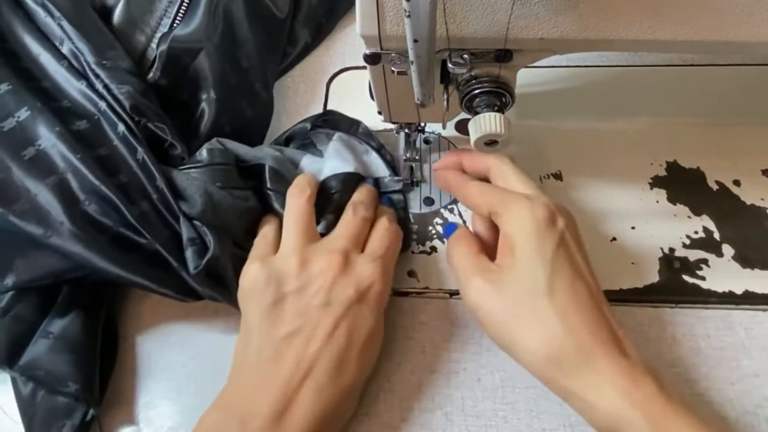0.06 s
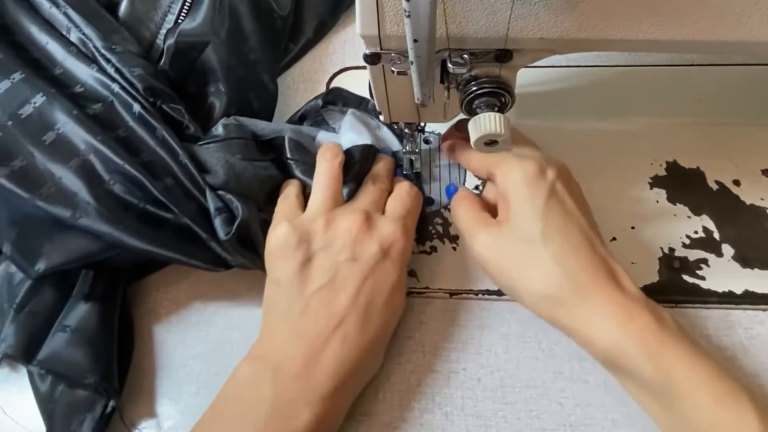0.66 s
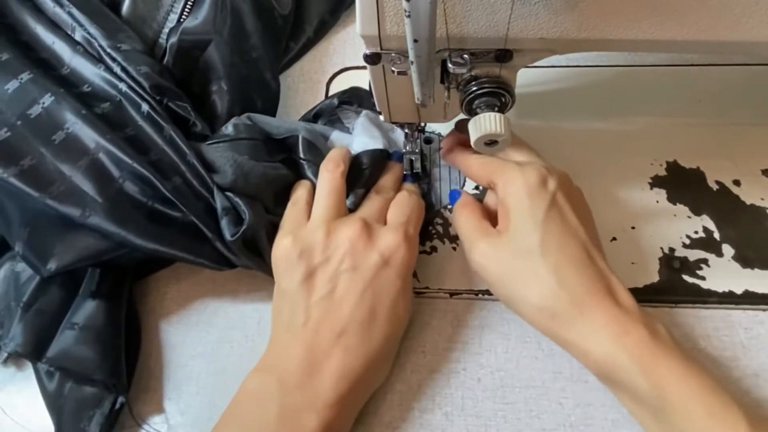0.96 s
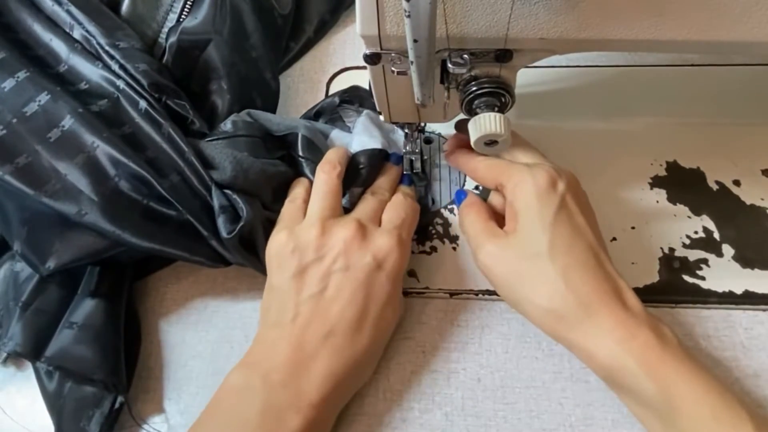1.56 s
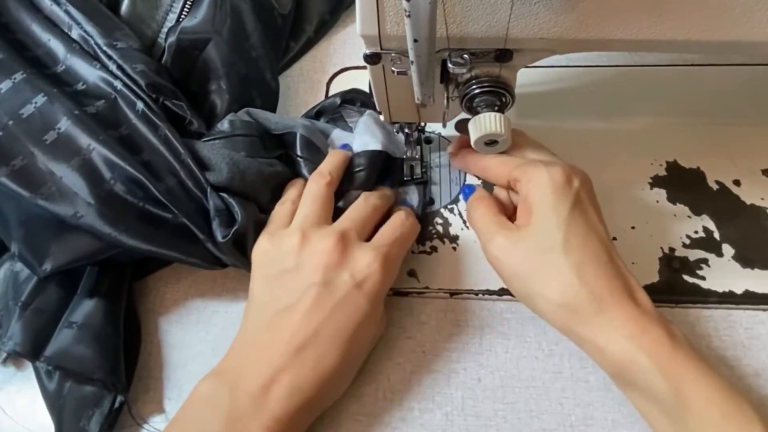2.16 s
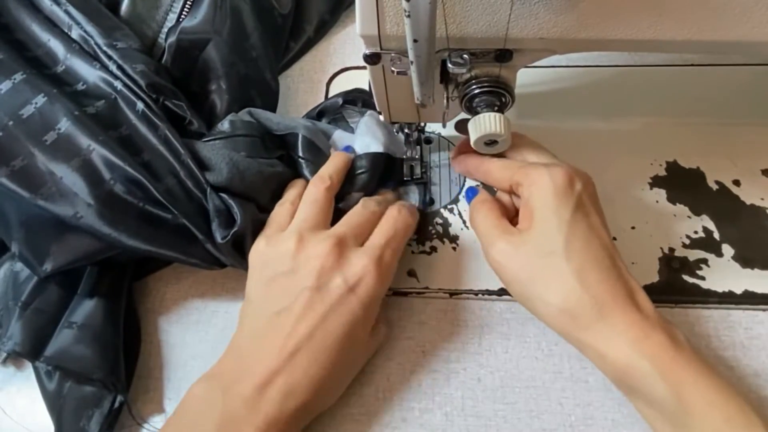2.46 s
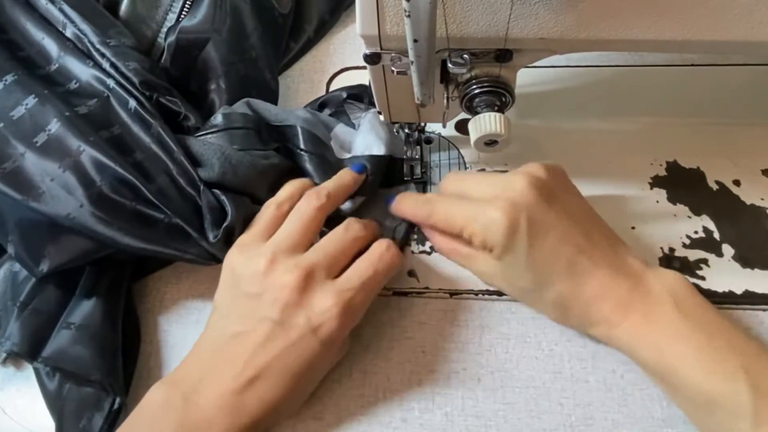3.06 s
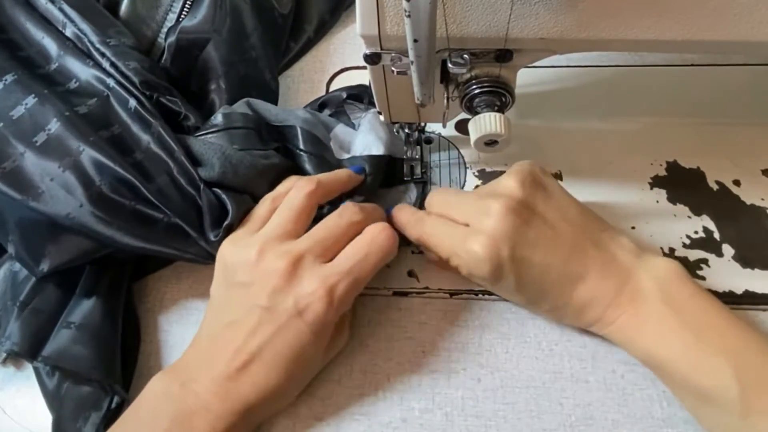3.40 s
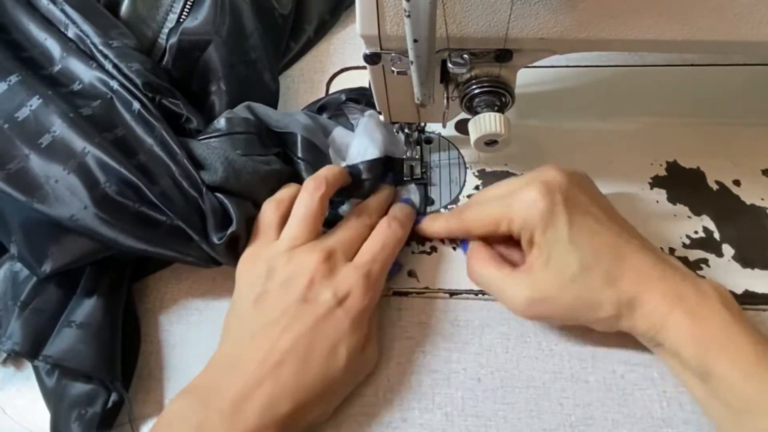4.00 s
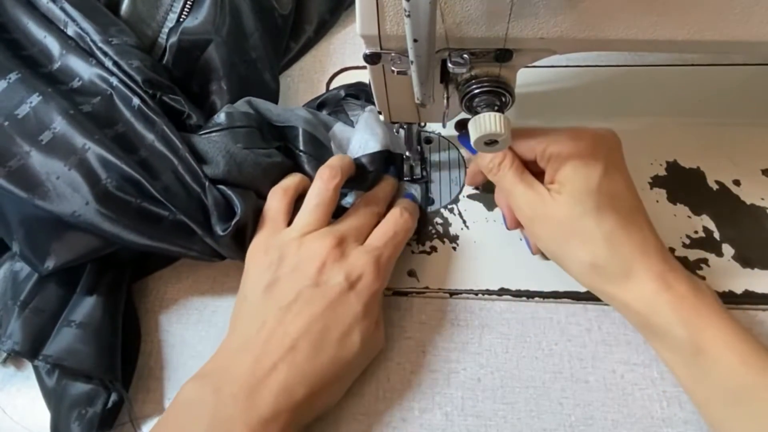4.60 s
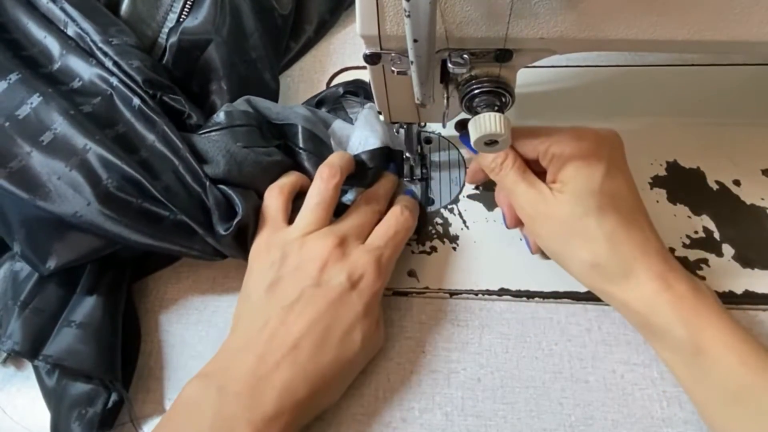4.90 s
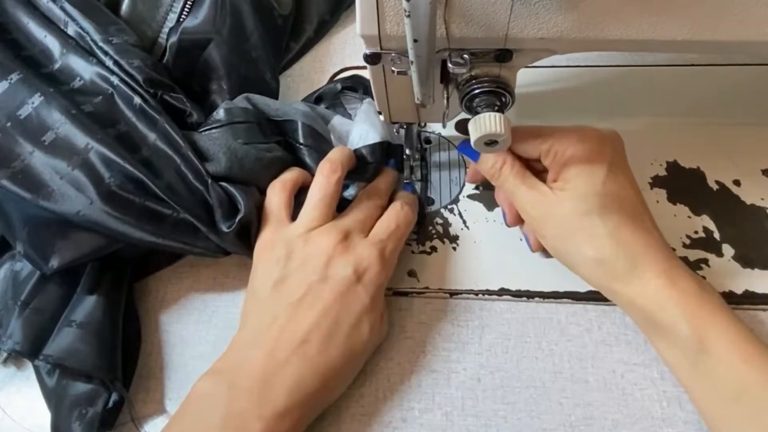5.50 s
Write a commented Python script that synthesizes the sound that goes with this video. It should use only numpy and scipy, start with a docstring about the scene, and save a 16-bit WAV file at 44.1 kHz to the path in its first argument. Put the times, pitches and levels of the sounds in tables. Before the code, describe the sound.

Two sharp metal clacks at a sewing machine, followed by quiet cloth handling, light ticking and a faint motor whine.

```python
"""A small workroom: slick jacket fabric is positioned under an industrial sewing machine's presser foot.
The steel foot clacks up and later down, buzzing its spring and making the table boom.
The cloth swishes, scuffs and ticks under the fingers. Then the servo motor switches on with a thin
whine, the mechanism creeps round with soft knocks and ticks, and thread scrapes through its guides.
At the end the drive holds the shaft with a louder hum."""
import sys
import numpy as np
from scipy import signal
from scipy.fft import rfft, irfft, next_fast_len
from scipy.io import wavfile

SR = 44100
rng = np.random.default_rng(int(sys.argv[2]) if len(sys.argv) > 2 else 0)


def wav_record(signal):
    """Record a signal, one row per channel, as 16-bit PCM in the file named by sys.argv[1]."""
    frames = np.transpose(np.atleast_2d(signal))
    bounded = np.clip(frames, -1, 1)
    # unit amplitude maps onto the largest positive 16-bit level
    quanta = np.round(bounded * 32767).astype(np.int16)
    wavfile.write(sys.argv[1], SR, quanta)


N = 249165
MOTOR_ON_S, MOTOR_HOLD_S, MOTOR_OFF_S = 4.228, 5.52, 5.68
MOTOR_ATTACK_S, MOTOR_RELEASE_S = 0.0041, 0.05


# steel hits of the foot and its linkage:
# (time [s], level [dB], treble tilt [dB/octave], crack t60 [s], ring level [dB], ring centre [Hz])
FOOT_CLACKS = [(0.109, -51, -4.5, 0.19, -31, 2987), (0.15, -39.5, 0.5, 0.17, -22, 5000),
               (0.157, -19, 0.5, 0.059, -26.5, 8980), (0.1818, -11, -1, 0.031, -16.5, 8980),
               (0.188, -22.5, -5.5, 0.12, -14, 2718), (1.708, -53.5, -5, 0.086, -26, 5010),
               (1.7179, -31.5, -2, 0.079, -22, 5000), (1.733, -9.5, -0.5, 0.037, -10.5, 4500),
               (1.7376, -18.5, -6, 0.06, -6.5, 4590), (4.003, -44.5, -6.5, 0.27, -19, 1400)]
# ring of the steel: (frequency [Hz], level [dB], t60 [s])
STEEL_MODES = [(1394, -10, .25), (2040, -11, .18), (2690, -6, .2), (2720, -3.5, .24), (2870, -8, .18),
               (3290, -3, .18), (4650, -8.5, .2), (4300, -2, .25), (4570, -7, 0.18), (4900, -7.5, 0.34),
               (6280, -12, .22), (7450, -7, .2), (8870, -5.5, 0.19), (11400, -10.5, .15),
               (11900, -5.5, .12), (12000, -6, .14), (12760, -8.5, 0.13)]
# tone of the crack and rattle: (frequency [Hz], level [dB])
CRACK_EQ = [(60, -40), (200, -7), (600, 2.5), (1100, -6), (2000, 0), (3000, 0.5), (5000, 0.5), (7000, -1.5),
            (9500, -4), (12500, -4), (14500, -9), (16000, -17)]

def presser_foot(attack_t60=0.0068, rattle_t60=0.17):
    """Steel cracks on steel, the linkage rattles on, and the modes that the contact favours ring."""
    out, mode_hz = np.zeros((2, N)), np.array(STEEL_MODES)[:, 0]
    for s, db, tilt_db, t60, ring_db, centre_hz in FOOT_CLACKS:
        crack = from_db(3.5) * coloured(white(), CRACK_EQ, tilt_db) * dying(t60)
        chatter = grains(per_s=900, spread_db=4.6, size=SR // 2)
        rattle = from_db(-22) * coloured(chatter, CRACK_EQ, tilt_db) * dying(rattle_t60)
        octaves_away = abs(np.log2(mode_hz / centre_hz))
        ring = ringing(STEEL_MODES, ring_db - 8 - 9 * octaves_away)
        add(out, s, from_db(db) * (crack + rattle + ring) * (1 - dying(attack_t60)))
    return out


# the pressure spring buzzes as the foot snaps: (time [s], level [dB])
SPRING_BUZZES = [(0.185, -39), (1.738, -27.5)]
# a light steel part chinks: (time [s], level [dB])
CHINKS = [(3.7316, -62), (3.818, -41.5)]
# tone of each: (frequency [Hz], level [dB])
SPRING_EQ = [(1500, -23.5), (2000, -1.5), (2600, 0), (3300, -5), (4000, -8), (4500, 2.5), (4850, 3),
             (5300, -14.5), (6500, -10.5), (8500, -25.5)]
CHINK_EQ = [(1000, -9), (2600, -14), (3700, 5.5), (4400, -3), (5700, -20), (7200, 3), (8100, -6.5),
            (9300, -16), (11200, -13), (15000, -31)]

def loose_steel(hits, eq, t60, attack_t60=0.0023):
    """A loose steel part buzzes briefly in its broad resonances."""
    out = np.zeros((2, N))
    for s, db in hits:
        add(out, s, from_db(db) * burst(eq, t60, size=SR // 2) * (1 - dying(attack_t60)))
    return out


# blows that reach the table top: (time [s], level [dB], contact low-pass [Hz], boom level [dB])
TABLE_KNOCKS = [(0.112, -36.5, 450, -0.5), (0.163, -23.5, 165, -3.5), (0.186, -16.5, 1020, -6),
                (1.11, -53, 600, -10), (1.7352, -16, 2564, -7), (2.617, -59.5, 1500, -7.5),
                (3.636, -49.5, 1490, -13), (3.821, -45, 880, -2), (4.005, -33, 1400, -0.5),
                (4.232, -51, 1200, -3), (4.275, -41, 200, -4), (4.293, -37, 159, -4),
                (4.451, -47.5, 700, -11), (4.584, -45.5, 300, -5), (4.785, -46.5, 500, -3),
                (4.874, -45, 200, -1), (5.015, -49, 1005, -5.5), (5.074, -45, 396, -3.5),
                (5.169, -41.5, 259, -10), (5.36, -46, 500, 0), (5.4, -34, 390, -1), (5.514, -40, 900, -14),
                (5.547, -38, 300, -9)]
# boom of the top: (frequency [Hz], level [dB], t60 [s])
TABLE_MODES = [(80, -10.5, .22), (100.5, -15, 0.5), (121.6, -1.5, 0.33), (161.6, -2.5, 0.33),
               (190, -3, 0.18), (238.7, -8, 0.22), (290, -6.5, 0.38), (339, -15, 0.065), (406, -5.5, 0.1),
               (474, -1.5, .11), (542.4, -2, .16), (607, -6, 0.22), (729, -8, 0.12), (839, -9.5, 0.17),
               (1007, -11.5, 0.32), (1153, -15, 0.36)]
# tone of the thud: (frequency [Hz], level [dB])
THUD_EQ = [(30, -15), (70, 1), (150, 1), (280, 0), (520, -1), (900, -7.5), (1500, -22), (5000, -18.5),
           (12000, -25.5)]

def table_top(thud_t60=0.087, attack_t60=0.0057, lowest_hz=48):
    """The table top thuds and booms; a soft contact dulls the upper modes."""
    out = np.zeros((2, N))
    for s, db, contact_hz, boom_db in TABLE_KNOCKS:
        boom = ringing(TABLE_MODES, np.full(len(TABLE_MODES), boom_db))
        thud = from_db(3) * coloured(white(), THUD_EQ) * dying(thud_t60)
        knock = (boom + thud) * (1 - dying(attack_t60))
        add(out, s, from_db(db) * filtered(knock, 1, contact_hz, "low"))
    # below its first mode the top hardly radiates
    return filtered(out, 4, lowest_hz, "high")


# ticks of cloth, thread and needle bar: (time [s], level [dB], body trim [dB])
TICKS = [(0.47, -41.5, -3), (0.925, -42, -17), (0.939, -35, -24), (0.949, -33, -23), (0.964, -40.5, -18),
         (1.424, -41.5, -23), (1.438, -43.5, -10), (1.546, -53.5, -8), (1.603, -51.5, -7.5),
         (2.3125, -49, 1), (2.461, -43, -22), (3.3511, -43.5, -6), (3.573, -41, -20), (3.6345, -38.5, -3),
         (4.2414, -26.5, -1), (4.2481, -30, -1), (4.2802, -37, -5), (4.4266, -40, -16), (4.448, -43, -16),
         (4.506, -32, -3), (4.719, -38, -8), (4.735, -37, -10), (4.784, -38.5, 5.5), (4.7947, -33, -6),
         (4.858, -29, -24), (5.015, -31.5, -1.5), (5.0228, -28.5, -10), (5.0893, -35, 0), (5.1489, -36, -9),
         (5.2928, -29.5, -20), (5.303, -31.5, 2), (5.311, -22, -24), (5.4316, -34.5, -22.5),
         (5.522, -41.5, 9)]
# tone of a tick's two layers: (frequency [Hz], level [dB])
TICK_SNAP_EQ = [(1500, -7.5), (4000, -3.5), (7000, 1.5), (10000, -3.5), (12500, 0.5), (16000, -8.5)]
TICK_BODY_EQ = [(50, -22), (150, -6.5), (400, -4.5), (750, -5), (1150, -2.5), (1900, 0), (2600, 0),
                (4500, -5), (7000, -18), (15000, -37)]

def ticks(attack_t60=0.0021):
    """Each tick is a bright snap with a duller, longer body."""
    out = np.zeros((2, N))
    for s, db, body_db in TICKS:
        snap = from_db(-6) * burst(TICK_SNAP_EQ, t60=0.017)
        body = from_db(body_db - 8) * burst(TICK_BODY_EQ, t60=0.021)
        add(out, s, from_db(db) * (snap + body) * (1 - dying(attack_t60, snap.shape[1])))
    return out


# pops in the fabric: (time [s], level [dB])
FOLD_POPS = [(0.675, -38), (0.819, -42), (0.853, -38), (0.871, -38), (1.109, -40), (1.568, -41.5),
             (2.554, -42.5), (2.618, -33.5), (2.636, -37), (3.513, -40.5), (3.633, -44), (3.923, -40.5),
             (3.943, -39.5), (4.783, -35), (5.015, -34.5), (5.267, -37), (5.401, -34), (5.432, -39.5),
             (5.463, -46)]
# their hollow tone: (frequency [Hz], level [dB])
FOLD_EQ = [(50, -25), (150, -4.5), (400, -1.5), (750, -1), (1150, 5), (1650, -5.5), (2300, -7.5),
           (3500, -15), (7000, -27), (15000, -34)]

def cloth_folds():
    """Folds of cloth flip over, each with a short pop."""
    out = np.zeros((2, N))
    for s, db in FOLD_POPS:
        add(out, s, from_db(db - 8) * burst(FOLD_EQ, t60=0.019))
    return out


# pushes on the cloth: (start [s], end [s], swish level [dB], scuff level [dB])
FINGER_STROKES = [(-0.05, 0.17, -71, -61), (0.35, 0.8, -66, -61), (0.455, 0.575, -50, -68),
                  (0.72, 0.93, -73, -60), (0.88, 0.995, -55.5, -54), (1.04, 1.14, -79, -71),
                  (1.145, 1.245, -78, -63.5), (1.375, 1.475, -71, -66), (1.53, 1.62, -78, -73),
                  (1.625, 1.705, -80, -72), (1.88, 2.14, -63, -66), (2.165, 2.295, -61, -61.5),
                  (2.275, 2.385, -66.5, -64), (2.42, 2.54, -71, -70), (2.51, 2.84, -65, -66.5),
                  (2.8, 2.97, -65.5, -68), (2.95, 3.12, -69, -72), (3.165, 3.285, -67, -75),
                  (3.25, 3.4, -62.5, -66), (3.41, 3.53, -82, -71), (3.48, 3.71, -66, -62.5),
                  (3.71, 3.85, -66.5, -63), (3.85, 4.07, -63, -63), (4.24, 4.37, -67, -59),
                  (4.42, 4.61, -61, -60), (4.74, 4.83, -56, -55), (5.03, 5.125, -52.5, -58),
                  (5.31, 5.415, -50.5, -56), (5.39, 5.57, -58.5, -54), (5.52, 5.65, -78, -64),
                  (5.61, 5.73, -62, -60)]

def finger_strokes():
    """Swish and scuff envelopes: the fingers push the cloth along and work it lightly in between."""
    fingering = swell(start_s=1.6, end_s=4.5)
    swish, scuff = from_db(-83.5) * fingering, from_db(-81) * fingering
    for start, end, swish_db, scuff_db in FINGER_STROKES:
        push = swell(start, end)
        swish = np.hypot(swish, from_db(swish_db) * push)
        scuff = np.hypot(scuff, from_db(scuff_db) * push)
    return swish, scuff


# bright swish and hollow fingertip scuff: (frequency [Hz], level [dB])
SWISH_EQ = [(1200, -12), (3000, 2.5), (4500, 1), (7000, -2.5), (9800, -4.5), (12300, -1.5), (14200, -1.5),
            (15500, -22)]
SCUFF_EQ = [(50, -26), (150, -10), (400, -10), (750, -4), (1150, 4), (1700, -0.5), (2300, -6.5),
            (3500, -13.5), (7000, -24.5), (15000, -34.5)]

def cloth_rustle(swish, scuff, shaft):
    """Cloth scuffs in sparse snaps and slides in dense ones, also creeping along as the shaft turns."""
    grit = coloured(grains(per_s=2000, spread_db=1.26), SCUFF_EQ)
    slide = coloured(grains(per_s=31000, spread_db=4.0), SWISH_EQ)
    return scuff * grit + np.hypot(swish, from_db(-68.5) * shaft) * slide


# harder pulls on the thread: (start [s], end [s], level [dB])
THREAD_PULLS = [(4.83, 4.96, -62.5), (5.04, 5.22, -58.5), (5.37, 5.558, -55)]
# tone of the scrape: (frequency [Hz], level [dB])
THREAD_EQ = [(150, -20), (700, -2), (1200, -4), (1650, 3), (2250, 2.5), (2900, -1.5), (4000, -7.5),
             (7000, -9), (15000, -40)]

def thread_scrape(shaft):
    """Thread scrapes through its guides while the shaft turns, louder when drawn off harder."""
    pulls = sum(from_db(db) * swell(start, end) for start, end, db in THREAD_PULLS)
    scrape = coloured(grains(per_s=1300, spread_db=1.5), THREAD_EQ)
    return np.hypot(pulls, from_db(-64) * shaft) * scrape


# partials of the whine: (harmonic [number], level [dB])
WHINE_PARTIALS = [(1, 3), (2, -2), (3, -7), (4, -9), (5, -7), (6, -4), (7, -6)]
# hum of the held shaft through the table: (frequency [Hz], level [dB])
HOLD_HUM = [(128, 0), (163, 0), (401, -1.5)]

def servo_motor(shaft, whine_hz=2011.3, hum_hz=392, flutter=0.44):
    """The drive's switching whines in the windings over a hum; a louder hum holds the shaft."""
    phase_per_hz = 2 * np.pi * np.arange(N) / SR
    whine = sum(from_db(db) * np.sin(harmonic * whine_hz * phase_per_hz + 2 * np.pi * rng.random())
                for harmonic, db in WHINE_PARTIALS)
    running = from_db(-70.5) * whine + from_db(-71) * np.sin(hum_hz * phase_per_hz)
    held = sum(from_db(db - 57) * np.sin(hz * phase_per_hz) for hz, db in HOLD_HUM)
    holding = swell(MOTOR_HOLD_S, MOTOR_OFF_S, MOTOR_ATTACK_S, MOTOR_RELEASE_S)
    # the current varies with the load
    current = 1 + flutter * rms_one(filtered(white(N), 2, 25, "low"))
    return np.sqrt(2) * current * (shaft * running + holding * held)


# low rumble in the table: (frequency [Hz], level [dB])
RUMBLE_EQ = [(25, -12.5), (60, -3), (125, 1), (200, -3), (300, -0.5), (480, -1), (750, -11.5), (1500, -37)]

def table_rumble(scuff, shaft):
    """Resting hands, scuffing fingers and the turning mechanism rumble through the table."""
    resting = from_db(-81.5)
    moving = np.hypot(from_db(-2.5) * scuff, from_db(-59) * shaft)
    return (resting + moving) * coloured(white(N), RUMBLE_EQ)


# reverb tail: (frequency [Hz], t60 [s])
ROOM_DECAY = [(100, 0.53), (400, 0.46), (1500, 0.43), (5000, 0.25), (8000, 0.73), (13000, 0.091)]

def workroom_reverb(send, build_t60=0.0033):
    """Diffuse reflections build up quickly, and each band dies away at its own rate."""
    noise, tail = coloured(white(), eq=[(20, 0), (20000, 0)]), 0
    edges_hz = np.geomspace(50, 16000, 9)
    for low, high in zip(edges_hz, edges_hz[1:]):
        band = filtered(noise, 2, [low, high], "band")
        tail = tail + band * dying(at_hz(ROOM_DECAY, np.sqrt(low * high)))
    response = rms_one(tail * (1 - dying(build_t60))) / np.sqrt(tail.shape[1])
    return signal.fftconvolve(send, response, axes=1)[:, :N]


# background bed: (frequency [Hz], level [dB])
ROOM_TONE_EQ = [(20, -7), (60, 8), (150, 0), (400, -12), (700, -14), (1200, -9.5), (2200, -19),
                (6000, -23.5), (12000, -25), (16000, -34.5)]

def room_tone():
    """A faint, steady, bass-heavy noise lies under everything."""
    return from_db(-73.5) * coloured(white(N), ROOM_TONE_EQ)


# stereo image at the two microphone ports: (frequency [Hz], likeness [ratio, clipped to 0..1 in use])
PORT_LIKENESS = [(100, 0.92), (400, 0.91), (1200, 0.05), (2600, -0.1455), (6000, 0.43), (9000, -0.45),
                 (12000, 1.3), (14000, 0.54)]

def coloured(pair, eq, tilt_db=0):
    """Two unrelated signals become left and right with the given EQ and the ports' likeness; rms 1."""
    size = next_fast_len(pair.shape[1])
    hz = np.fft.rfftfreq(size, 1 / SR)
    alike = np.clip(at_hz(PORT_LIKENESS, hz), 0, 1)
    octaves = np.log2(1 + hz / 500)
    mid, side = rfft(pair, size) * from_db(at_hz(eq, hz) + tilt_db * octaves)
    ports = np.sqrt(1 + alike) * mid + np.sqrt(1 - alike) * side * [[1], [-1]]
    return rms_one(irfft(ports, size)[:, :pair.shape[1]])


def ringing(modes, weights_db):
    """Struck modes of alternating polarity; each port hears every mode with its own phase."""
    t, out = np.arange(SR // 2) / SR, 0
    for k, ((hz, db, t60), weight_db) in enumerate(zip(modes, weights_db)):
        alike = np.clip(at_hz(PORT_LIKENESS, hz), 0, 1)
        phase = .5 * rng.standard_normal((2, 1)) * np.arccos(alike)
        out = out + (-1) ** k * from_db(db + weight_db) * np.sin(2 * np.pi * hz * t + phase) * dying(t60)
    return out


def burst(eq, t60, size=SR // 8):
    """A dense cluster of tiny impacts that dies away."""
    return coloured(white(size), eq) * dying(t60, size)


def grains(per_s, spread_db, size=N):
    """Random tiny snaps of uneven size, each heard at both ports."""
    strengths = from_db(spread_db * np.minimum(rng.exponential(1, size), 4))
    return (rng.random(size) < per_s / SR) * strengths * white(size)


def white(size=SR // 2):
    """Two unrelated noises."""
    return rng.standard_normal((2, size))


def swell(start_s, end_s, attack_s=0.053, release_s=0.068):
    """An envelope that fades in from the start, tops out at 1 and is back at 0 by the end."""
    t = np.arange(N) / SR
    return np.clip(np.minimum((t - start_s) / attack_s, (end_s - t) / release_s), 0, 1)


def dying(t60, size=SR // 2):
    """Exponential decay from 1, down 60 dB after t60 seconds."""
    return np.exp(-np.log(1000) * np.arange(size) / (SR * t60))


def filtered(x, order, hz, kind):
    """Low-, high- or band-pass filter."""
    return signal.sosfilt(signal.butter(order, hz, kind, fs=SR, output="sos"), x)


def from_db(db):
    """Decibels to gain."""
    return 10 ** (np.asarray(db) / 20)


def rms_one(x):
    """Scale to rms 1."""
    return x / np.sqrt(np.mean(x ** 2) + 1e-20)


def at_hz(points, hz):
    """Read a table on a log-frequency axis."""
    known_hz, values = np.transpose(points)
    return np.interp(np.log(np.maximum(hz, 1)), np.log(known_hz), values)


def add(out, s, sound):
    """Mix a sound in at time s."""
    at = round(s * SR)
    out[:, at:at + sound.shape[1]] += sound[:, :N - at]


def scene():
    """The mix: foot, knocks, small ticks and handling feed the reverb; the motor stays dry."""
    # 1 while the shaft creeps round, 0 before and after
    shaft = swell(MOTOR_ON_S, MOTOR_HOLD_S + MOTOR_RELEASE_S, MOTOR_ATTACK_S, MOTOR_RELEASE_S)
    swish, scuff = finger_strokes()
    foot = presser_foot() + loose_steel(SPRING_BUZZES, SPRING_EQ, t60=0.34)
    knocks = table_top()
    small = ticks() + loose_steel(CHINKS, CHINK_EQ, t60=0.28)
    cloth = cloth_folds() + cloth_rustle(swish, scuff, shaft)
    handling = cloth + thread_scrape(shaft) + table_rumble(scuff, shaft)
    send = from_db(-9.5) * foot + from_db(-13) * knocks + from_db(-13.5) * small + from_db(-14) * handling
    return foot + knocks + small + handling + servo_motor(shaft) + workroom_reverb(send) + room_tone()


# pan across the spectrum: (frequency [Hz], left minus right [dB])
PORT_BALANCE = [(50, -1.5), (110, 2.5), (250, -0.5), (550, -0.5), (1200, -2.5), (3300, -1.5), (5800, -4.5),
                (9000, -1), (13000, 1)]
# phase between the ports: (frequency [Hz], left lead [rad])
PORT_PHASE = [(60, 0), (125, -.4), (250, -1), (550, -1.7), (2000, -2.2), (3300, -2.7), (4100, -1),
              (5200, -3.4), (6600, -6.2), (7600, -4.2), (9600, -2.5), (11300, -.2), (13000, .1), (15000, 3)]

def record(dry, bass_cut_hz=28, top_cut_hz=15700):
    """The two microphone ports differ in phase and level; deep bass and the very top are cut."""
    size = next_fast_len(N + SR // 10)
    hz = np.fft.rfftfreq(size, 1 / SR)
    left, right = rfft(dry, size) * from_db(at_hz(PORT_BALANCE, hz) * np.array([[.5], [-.5]]))
    left = left * np.exp(1j * at_hz(PORT_PHASE, hz))
    ports = irfft(np.array([left, right]), size)[:, :N]
    ports = filtered(ports, 2, bass_cut_hz, "high")
    return signal.sosfilt(signal.ellip(10, .2, 80, top_cut_hz, fs=SR, output="sos"), ports)


dry = scene()
out = record(dry)
wav_record(out)
```